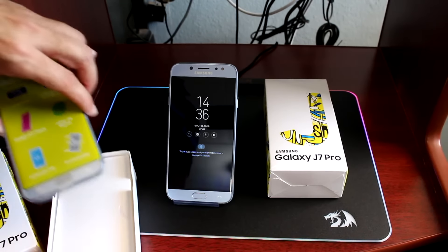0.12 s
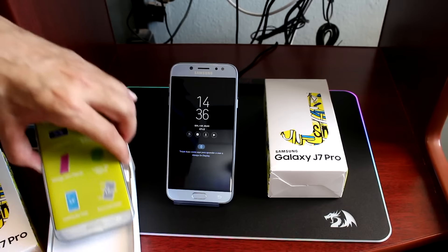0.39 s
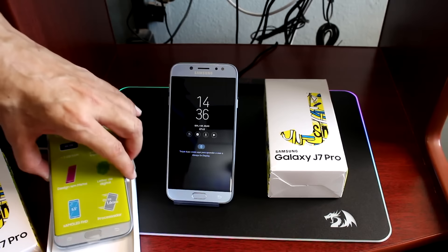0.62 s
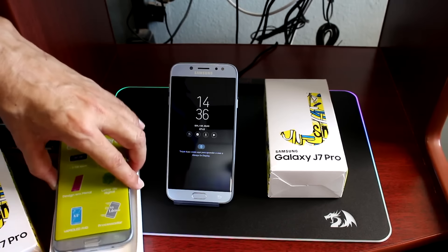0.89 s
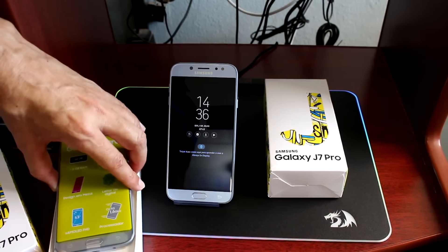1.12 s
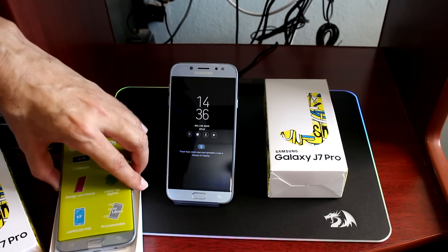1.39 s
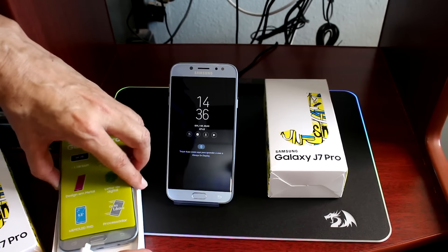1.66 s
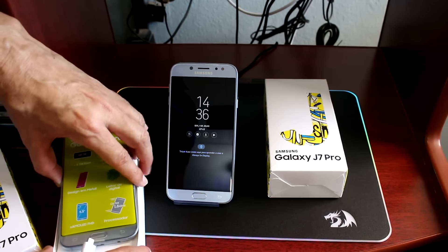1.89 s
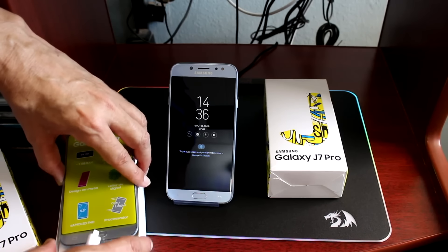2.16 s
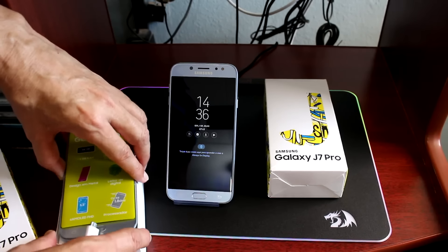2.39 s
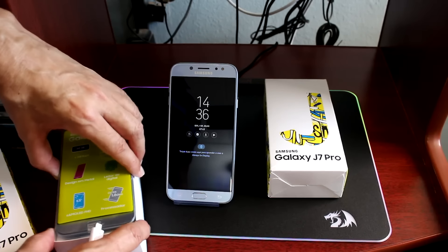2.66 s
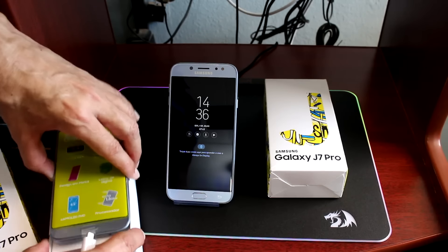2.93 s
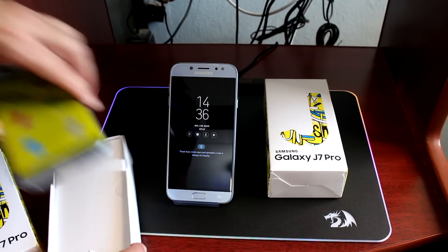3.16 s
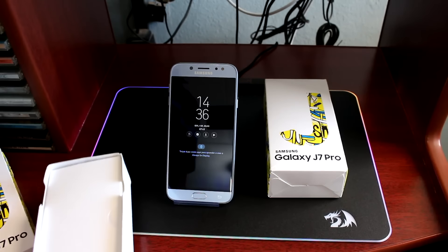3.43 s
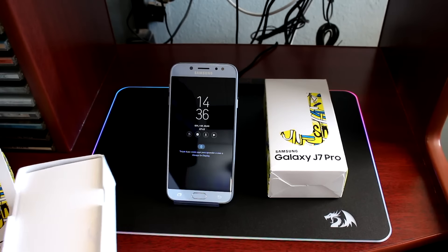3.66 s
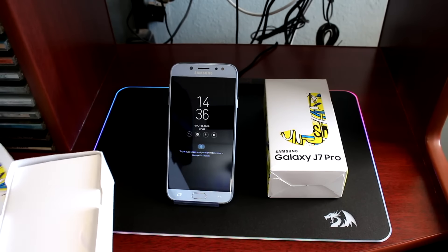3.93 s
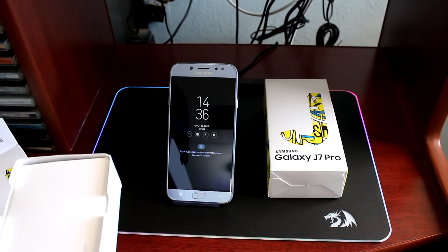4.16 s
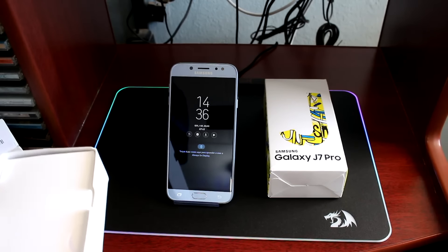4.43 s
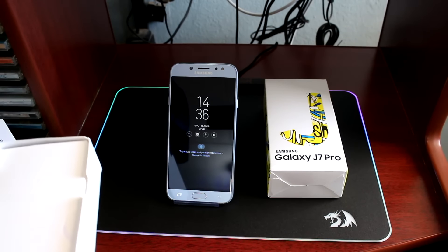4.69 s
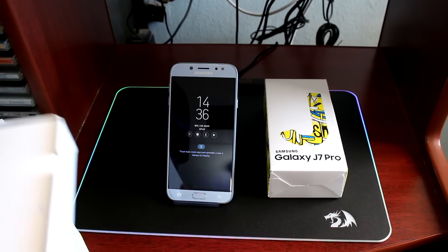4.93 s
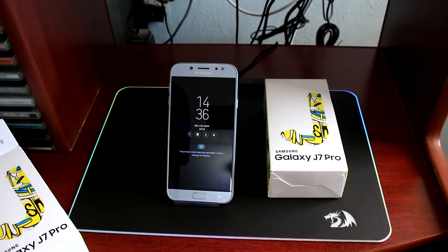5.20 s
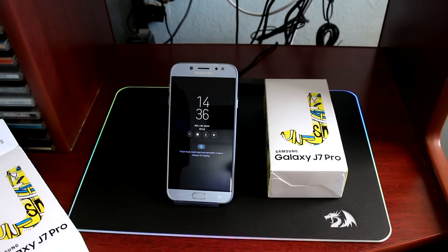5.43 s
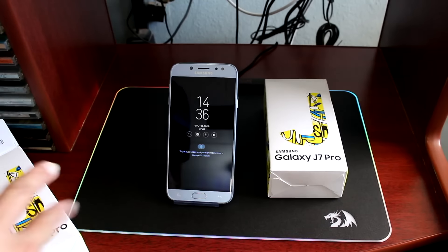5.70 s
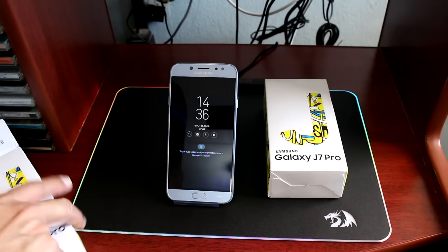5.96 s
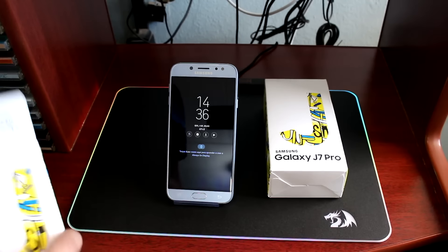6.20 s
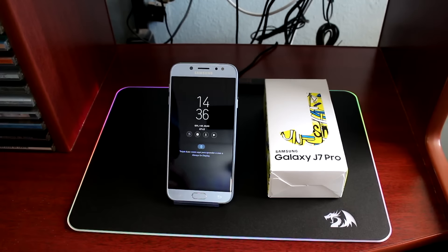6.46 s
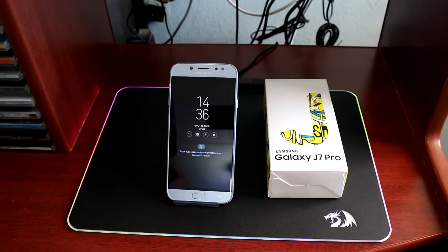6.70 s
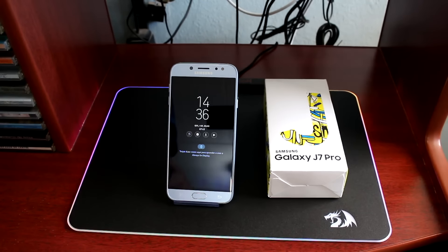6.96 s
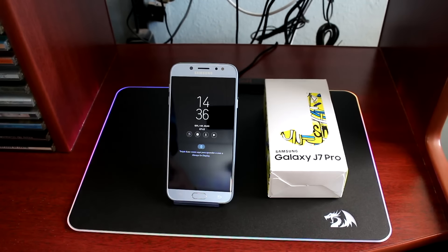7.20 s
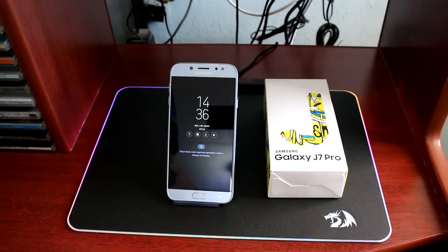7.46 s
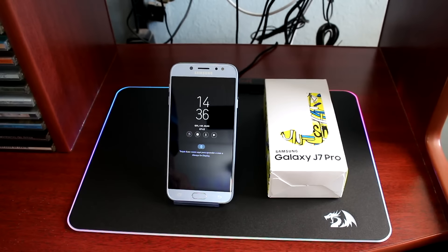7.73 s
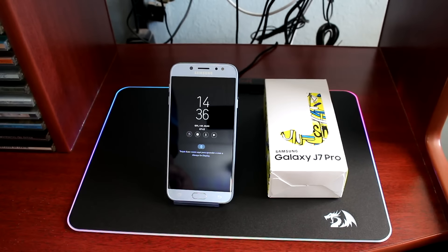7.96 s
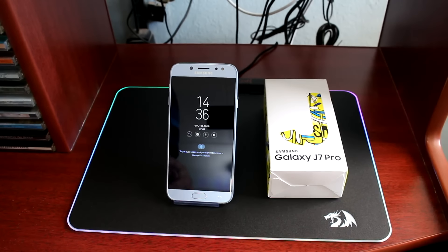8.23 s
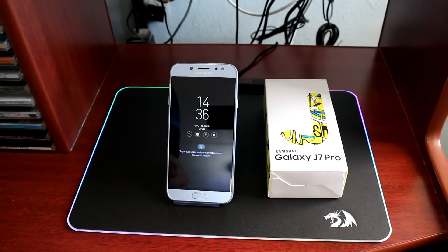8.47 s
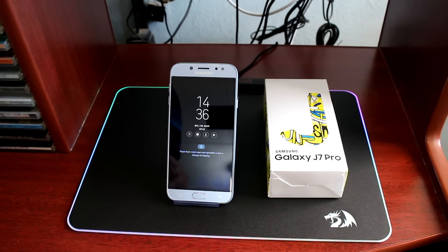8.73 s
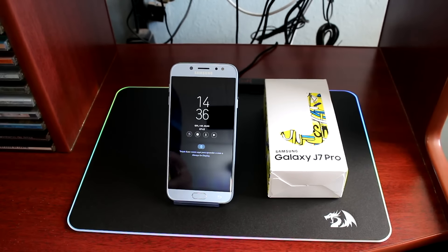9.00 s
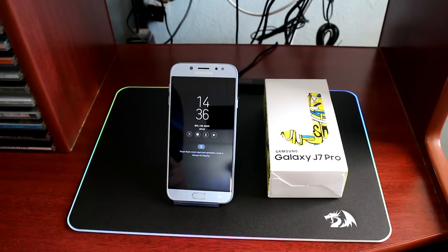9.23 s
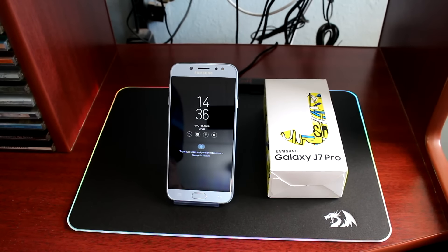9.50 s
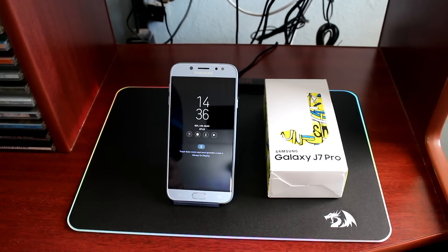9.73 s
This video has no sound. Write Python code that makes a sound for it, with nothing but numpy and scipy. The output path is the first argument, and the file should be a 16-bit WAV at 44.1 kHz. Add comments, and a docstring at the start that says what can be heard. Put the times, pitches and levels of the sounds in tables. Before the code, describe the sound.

Hollow cardboard boxes knock, scrape and tick on a wooden desk over steady hiss and low hum, busiest near the end.

```python
"""Steady hiss and hum under faint rubbing; within a quarter second, knocks of cardboard on wood.
Hands move boxes and a card tray about on a desk in a small room, close to a two-port microphone.
Each knock excites desk, box and edge resonances by one contact and a rattle; drags and slides are
random catches of fibres into resonances, ticks and scuffs are shaped noise bursts from card edges.
The room adds a brief echo; a faint thin tone wavers early on."""
import sys
import numpy as np
from scipy import signal
from scipy.fft import rfft, irfft, next_fast_len
from scipy.io import wavfile
from scipy.ndimage import uniform_filter1d, map_coordinates

SR = 44100
rng = np.random.default_rng(int(sys.argv[2]) if len(sys.argv) > 2 else 0)


def master(y):
    """Save y as 16-bit WAV."""
    cut = np.clip(np.atleast_2d(y).T, -1, 1)
    pcm = np.round(cut * 32767)  # scale
    wavfile.write(sys.argv[1], SR, pcm.astype(np.int16))


def gain_from_decibels(decibels):
    """Convert decibel values to linear amplitude factors."""
    exponent = np.asarray(decibels, float) / 20
    return 10 ** exponent


N = 435266

# hum and hiss spectrum: f/Hz, relative level/dB
HISS_SPECTRUM = [(22, -18), (38, -11), (52, -3.5), (95, -5), (140, 1.5), (227, -1.5), (278, -3.5),
                 (637, -6), (687, -8.5), (862, -7), (1230, -8), (2890, -14), (7900, -22), (13100, -27.5),
                 (15600, -31.5)]
# left-right correlation of the hiss: f/Hz, correlation/1
HISS_CORRELATION = [(60, 0.41), (240, -0.16), (950, -0.55), (3770, -0.35), (15000, -0.066)]
# decay of the room: f/Hz, t60/s
ROOM_T60 = [(100, 1), (260, 0.18), (700, 0.35), (1840, 0.27), (4850, 0.34), (12000, 0.13)]
# gain of the side echo: f/Hz, gain/dB
ROOM_SIDE_GAIN = [(100, -40), (300, -13), (700, -10), (1500, -9), (4000, -0.5), (12000, -23)]
# left minus right level at the ports: f/Hz, level/dB
PORT_LEAN = [(60, -3), (200, -1.5), (700, -5), (2400, -0.5), (4400, 1.5), (15000, 0.5)]
# left minus right phase at the ports: f/Hz, phase/rad
PORT_LEAD = [(100, -.05), (600, -.1), (1500, .55), (3500, .7), (8000, 1.2), (13000, 2.2)]
# thin tone: t/s, f/Hz, level/dB
WHINE_TRACK = [(0.68, 1450, -65), (0.75, 1390, -58), (0.85, 1396, -81), (1.3, 1392, -64.5),
               (1.56, 1390, -67)]
# desk resonances: f/Hz, width/Hz, level/dB
DESK_MODES = [(49.4, 21, -15), (140.7, 16.2, -1), (201, 56, -4.5), (259.2, 28.4, 3.5), (337, 70, -3)]
# hollow box resonances: f/Hz, width/Hz, level/dB
BOX_MODES = [(420, 17, 1), (508, 60, 0.5), (624, 41, -1), (679, 31, -2.5), (740, 29, 2.5), (830, 70, 0.5),
             (980, 53, 1), (1120, 105, 2.5), (1270, 33, 0), (1364, 32, 1)]
# stiff edge resonances: f/Hz, width/Hz, level/dB
EDGE_MODES = [(1600, 92, 4), (1964, 220, 0.5), (2306, 260, 2.5), (2650, 273, 2.5), (3000, 200, 2),
              (3450, 550, -1), (4480, 540, -6)]
# broad treble resonances of card: f/Hz, width/Hz, level/dB
SHEEN_MODES = [(4520, 5650, -6), (9200, 11000, -17)]
# flap resonances under a scuffing edge: f/Hz, width/Hz, level/dB
FLAP_MODES = [(1000, 73, 8), (2400, 350, 0.5), (3500, 350, 2), (5400, 900, -6), (8800, 2000, -18)]
# strokes of a box over desk or card:
# t at full strength/s, hold/s, desk drag level/dB, box rumble level/dB, card scrape level/dB
STROKES = [(0.15, 0.066, -67, -61.5, -69), (0.24, 0.031, -67, -53.5, -61), (0.29, 0.05, -72, -52, -57.5),
           (0.44, 0.011, -60, -54, -66), (0.6, 0.06, -65, -57.5, -64), (0.7, 0.17, -66, -62, -65),
           (0.97, 0.13, -62, -58.5, -63.5), (2.2, 0.019, -67, -53.5, -58.5), (2.41, 0.02, -58.5, -53, -66),
           (2.55, 0.027, -81, -61, -74), (3.08, 0.11, -74, -64, -64), (3.23, 0.056, -63, -56, -60),
           (3.7, 0.025, -66, -82, -61.5), (3.965, 0.072, -50, -50, -54.5), (4.13, 0.12, -47.5, -45, -55.5),
           (4.38, .015, -63, -57, -54.5), (4.405, 0.1, -37, -43, -56), (4.51, 0.18, -40, -47, -59.5),
           (4.86, 0.036, -50, -47, -58), (5.34, 0.049, -85, -57, -61), (5.58, 0.1, -67, -57, -60.5),
           (6.065, 0.016, -54, -50, -52), (6.447, 0.02, -65, -47, -48), (6.22, 0.039, -72, -70, -73),
           (6.585, .02, -57, -54, -71), (6.92, 0.016, -72, -54, -74), (7.2, 0.0096, -78, -52, -61),
           (7.39, 0.055, -67, -55.5, -58.5), (7.51, 0.028, -75, -53, -59.5), (7.577, 0.074, -59, -54, -57),
           (7.69, 0.039, -50, -47, -63), (7.78, 0.03, -38, -36.5, -51), (7.94, 0.015, -58, -47.5, -48.5),
           (8.07, 0.039, -48, -47, -50), (8.2, 0.13, -57, -49, -52.5), (8.27, 0.07, -55.5, -47, -47),
           (8.35, 0.11, -46.5, -42, -44), (8.65, 0.088, -67, -43.5, -45), (8.71, 0.041, -34, -34.5, -43),
           (9.13, 0.043, -64, -61, -73), (9.44, 0.033, -65, -69, -76), (9.69, 0.049, -65, -57, -67)]
# card sliding fast and lightly: t at full strength/s, hold/s, level/dB
SWISHES = [(0.6, .02, -72), (1.595, .02, -61), (1.81, 0.021, -56), (4.11, 0.11, -61), (4.22, 0.0088, -55),
           (4.41, 0.012, -58), (4.64, 0.013, -55.5), (6.06, 0.063, -59), (6.16, 0.016, -55),
           (7.85, 0.015, -55), (8.07, 0.012, -50.5), (8.2, 0.063, -54.5), (8.26, 0.027, -48.5),
           (8.31, 0.13, -44), (8.52, .02, -55), (8.65, 0.09, -51.5), (9.7, 0.12, -65.5)]
# median level of restless fingers: drag/dB, rumble/dB, scrape/dB, slide/dB
FUMBLE_LEVELS_DB = [-78.5, -74.5, -98, -73]
# pitches the hand leaves free to ring while card rubs: t/s, box f/Hz, edge f/Hz
GRIP_TRACK = [(0, 900, 1900), (0.3, 1100, 2200), (0.45, 800, 1900), (0.8, 1050, 1900), (1.05, 720, 2300),
              (2.2, 1150, 2100), (3.3, 1150, 2100), (3.7, 430, 2800), (4.12, 620, 2200), (4.4, 600, 2400),
              (4.53, 450, 2000), (4.62, 557, 2000), (4.9, 560, 1600), (5.35, 1100, 1700), (5.6, 800, 2200),
              (6.1, 740, 2600), (6.46, 980, 3000), (6.6, 800, 2100), (7.4, 820, 1900), (7.8, 740, 2300),
              (8.1, 780, 2400), (8.25, 1000, 2650), (8.36, 900, 2650), (8.47, 760, 2000), (8.7, 720, 1650),
              (9.87, 780, 2200)]
# scuffs of an edge along a flap: t/s, length/s, peak level/dB
SCUFFS = [(6.449, 0.038, -27), (7.91, 0.031, -36)]
# small dry ticks of card edges: t/s, peak level/dB, f/Hz, width/Hz
TICKS = [(1.04, -47, 2600, 1300), (1.585, -30.5, 3730, 1000), (1.7192, -28.5, 2830, 1800),
         (1.76, -45, 3300, 1500), (1.803, -24, 1770, 500), (1.805, -30, 5100, 2200),
         (2.2732, -46, 3180, 1500), (2.275, -38, 12000, 6000), (2.788, -45, 1800, 1500),
         (3.321, -42, 2560, 1300), (3.668, -42, 4500, 500), (3.677, -47, 4470, 900),
         (4.094, -33.5, 4500, 700), (4.225, -37, 2660, 1300), (4.378, -40, 4500, 3500),
         (4.634, -33.5, 9200, 4380), (4.635, -37, 5500, 1500), (4.638, -37.5, 3050, 1500),
         (4.9677, -38, 2940, 1500), (5.639, -41, 2070, 1000), (7.1831, -40, 4900, 2000),
         (7.576, -41, 2200, 1100), (8.5109, -18, 3060, 1500), (9.494, -46, 3280, 700),
         (9.568, -43, 1600, 600)]
# knocks: t/s, box ring peak level/dB, desk thud peak level/dB, edge click peak level/dB, ring f/Hz
KNOCKS = [(0.222, -37, -51, -41.5, 1120), (0.388, -33.5, -41, -44, 800), (0.432, -41, -64, -48, 1110),
          (0.46, -39, -48, -47, 800), (0.521, -33.5, -67, -57, 1150), (0.556, -33, -45.5, -41.5, 930),
          (0.622, -35.5, -46, -45, 886), (0.832, -41.5, -66, -55, 1120), (0.921, -34, -49, -41, 1016),
          (1.215, -45.5, -58, -60, 720), (1.257, -46, -62, -58, 1200), (1.586, -17.5, -31, -26.5, 474),
          (1.59, -23.5, -38.5, -34, 420), (1.613, -31.5, -40, -43, 420), (1.784, -56, -60, -65, 1130),
          (1.8, -17, -53, -23.5, 560), (1.805, -21, -52, -28.5, 510), (1.829, -24.5, -61, -51, 740),
          (2.785, -43.5, -49, -55, 401), (3.677, -50, -42.5, -49, 401), (3.803, -47, -45.5, -55, 401),
          (3.956, -28.5, -34, -34, 401), (4.087, -15, -29, -31.5, 604), (4.096, -26, -23.5, -46, 686),
          (4.134, -28, -30.5, -38, 420), (4.346, -36.5, -43, -41, 409), (4.402, -30, -33, -40, 765),
          (4.432, -38, -35, -50, 696), (4.481, -26, -32.5, -47, 423), (4.595, -28.5, -38, -50, 620),
          (4.68, -50, -37, -61, 420), (4.785, -13, -19, -22, 420), (4.796, -15.5, -28, -35, 524),
          (4.898, -14.5, -21.5, -30, 1290), (4.91, -15.5, -37, -28, 483), (4.939, -21.5, -32, -46, 645),
          (5.287, -46.5, -54, -45.5, 587), (5.331, -42, -63, -43, 1420), (5.35, -29, -65, -36, 1130),
          (5.373, -41, -61, -37.5, 1210), (5.419, -29.5, -46, -36.5, 840), (5.454, -36, -53, -53, 740),
          (5.523, -27, -34, -28.5, 830), (6.054, -36, -47, -46, 730), (6.105, -24, -39, -31, 514),
          (6.112, -28.5, -35, -37, 626), (6.157, -22, -30.5, -31.5, 710), (6.299, -36.5, -56, -42.5, 730),
          (6.434, -26, -48, -36, 980), (6.559, -20.5, -42, -26.5, 835), (6.847, -26, -31, -28, 580),
          (6.997, -39, -63, -63, 980), (7.056, -19, -49, -29.5, 940), (7.06, -23.5, -46, -34, 980),
          (7.137, -29.5, -52, -52, 846), (7.167, -34.5, -36.5, -40.5, 409), (7.592, -35, -53, -48, 970),
          (7.664, -22.5, -34.5, -38, 1120), (7.715, -21, -47, -26.5, 790), (7.737, -24.5, -52, -39, 1090),
          (7.756, -36, -32.5, -31, 1020), (7.765, -29, -29, -24.5, 900), (7.773, -14, -28, -25, 740),
          (7.779, -19.5, -36, -28, 740), (7.839, -26.5, -48, -31, 760), (7.937, -28, -50, -48.5, 750),
          (7.988, -33, -39.5, -35.5, 820), (8.011, -35.5, -59, -50, 807), (8.07, -35, -39, -41, 800),
          (8.203, -39, -43.5, -43, 1000), (8.237, -37, -57, -39, 1000), (8.268, -35, -48, -36, 1100),
          (8.341, -31, -32, -30, 1010), (8.4, -12.5, -32, -31, 760), (8.41, -17.5, -28.5, -19.5, 1000),
          (8.489, -30, -52, -44, 900), (8.511, -20, -44, -18, 1350), (8.596, -28, -52, -31.5, 1137),
          (8.641, -26.5, -39.5, -28, 760), (8.69, -25, -40, -22.5, 1140), (8.716, -8, -24.5, -13, 585),
          (8.725, -18, -44, -13, 760), (8.744, -30, -52, -42, 624), (9.039, -40, -62, -48, 1130),
          (9.081, -36.5, -53, -40.5, 800), (9.385, -46, -47, -47, 1100), (9.393, -41, -56, -43.5, 1380),
          (9.499, -41.5, -51, -42.5, 719), (9.621, -40, -44, -36.5, 900), (9.628, -35.5, -55, -43, 740),
          (9.676, -36.5, -58, -54, 760), (9.685, -36.5, -63, -38.5, 800), (9.742, -43, -48, -49, 573),
          (9.78, -37, -44, -40, 1180)]


def unit(x):
    """Scaled to rms 1."""
    return x / np.sqrt(np.mean(x ** 2) + 1e-20)


def along(points, hz):
    """(Hz, value) points interpolated on a log frequency axis."""
    f, v = np.transpose(points)
    return np.interp(np.log(hz + 1), np.log(f + 1), v)


def curves(rows):
    """One value per sample for each column after the time."""
    s, *cols = np.transpose(rows)
    return [np.interp(np.arange(N) / SR, s, c) for c in cols]


def wobble(knots_per_s):
    """A smooth random curve: a spline through normal draws."""
    knots = rng.standard_normal(int(N * knots_per_s / SR) + 4)
    return map_coordinates(knots, [np.arange(N) * knots_per_s / SR])


def filtered(x, response):
    """x times a complex response of frequency."""
    m = next_fast_len(x.shape[-1] + 8192)
    spectrum = rfft(x, m) * response(np.fft.rfftfreq(m, 1 / SR))
    return irfft(spectrum, m)[..., :x.shape[-1]]


def body(modes, shift_db=0, stretch=1, sign=-1):
    """Causal response of a sum of resonances, each with extra gain and detuning; sign=-1 alternates polarity."""
    hz, width, db = np.transpose(modes)[:, :, None]
    hz = hz * np.reshape(stretch, (-1, 1))
    polarity = sign ** np.arange(len(modes))[:, None]
    gain = gain_from_decibels(db + np.reshape(shift_db, (-1, 1))) * polarity
    return lambda f: np.sum(gain * 1j * f * width / (hz ** 2 - f ** 2 + 1j * f * width), axis=0)


def add(track, s, sound, peak_db):
    """Lays a sound on the track at a time and a peak level."""
    part = track[round(s * SR):][:len(sound)]
    part += gain_from_decibels(peak_db) * sound[:len(part)] / np.abs(sound).max()


def swells(rows, rise_db_per_s, fall_db_per_s):
    """Gain of each level column: every row swells, holds and dies away; powers add."""
    t = np.arange(0, N + 64, 64) / SR
    start, hold, *levels = np.transpose(rows)[:, :, None]
    rise_db = -rise_db_per_s * np.maximum(start - t, 0)
    fall_db = -fall_db_per_s * np.maximum(t - start - hold, 0)
    gains = [np.sqrt(np.sum(gain_from_decibels(db + rise_db + fall_db) ** 2, axis=0)) for db in levels]
    return [np.interp(np.arange(N) / SR, t, gain) for gain in gains]


def friction(modes, catches_per_s, spread_db, smooth, lumps_db, free_hz=None):
    """Fibres catch in clumps over a smooth rush into sharpened resonances; modes near free_hz ring most."""
    biggest = 2.2  # hardest catch, in units of spread_db
    grip_db_per_octave = 9
    hit = rng.random(N) < catches_per_s / SR * gain_from_decibels(lumps_db * wobble(14))
    strength = gain_from_decibels(spread_db * np.minimum(rng.exponential(1, N), biggest))
    grains = hit * rng.standard_normal(N) * strength
    rush = smooth * rng.standard_normal(N) * gain_from_decibels(lumps_db * wobble(25))
    force = unit(grains) + rush

    def ring(part):
        response = body(part)
        return unit(filtered(force, lambda f: response(f) * np.abs(response(f)) ** .5))

    if free_hz is None:
        return ring(modes)
    share = gain_from_decibels([db - grip_db_per_octave * np.abs(np.log2(hz / free_hz)) for hz, width, db in modes])
    rings = [(-1) ** k * ring([mode]) for k, mode in enumerate(modes)]
    return np.sum(share * rings, axis=0) / np.linalg.norm(share, axis=0)


def hiss():
    """Steady room hum and microphone hiss: shaped noise, slightly patchy in time and frequency."""
    rms_db = -53.5
    port_offset_db = np.array([[-.7], [.7]])
    z = signal.stft(rng.standard_normal((2, N)), nperseg=512)[2]
    field = uniform_filter1d(rng.standard_normal(z.shape[1:]), 6, 0)
    patches_db = 2.05 * unit(uniform_filter1d(field, 14, 1))
    pair = signal.istft(z * gain_from_decibels(patches_db), nperseg=512)[1][:, :N]

    def spectrum(hz):
        # mid and side shares that give the wanted correlation
        angle = np.arccos(np.clip(along(HISS_CORRELATION, hz), -1, 1)) / 2
        return gain_from_decibels(along(HISS_SPECTRUM, hz)) * [np.cos(angle), np.sin(angle)]

    mid, side = filtered(pair, spectrum)
    return gain_from_decibels(rms_db + port_offset_db) * unit(np.array([mid + side, mid - side]))


def room(x):
    """Mid and side echo by decaying noise, each frequency at its own speed; redrawn per hop as boxes move."""
    hop, delay = 12000, 260  # samples
    echo_db = -7.5
    out = np.zeros((2, N + SR))
    for start in range(0, N, hop):
        hz, t, z = signal.stft(rng.standard_normal((2, SR // 2)), SR, nperseg=256)
        decay = gain_from_decibels(-60 * t / along(ROOM_T60, hz)[:, None])
        tail = signal.istft(z * decay, SR, nperseg=256)[1]
        tail = tail / np.linalg.norm(tail[0])
        echo = signal.fftconvolve(x[None, start:start + hop], tail, axes=1)
        out[:, start + delay:][:, :echo.shape[1]] += echo
    mid, side = gain_from_decibels(echo_db) * out[:, :N]
    return mid, filtered(side, lambda hz: gain_from_decibels(along(ROOM_SIDE_GAIN, hz)))


def whine():
    """A faint thin sine wavers in pitch and level and fades early on."""
    hz, db = curves(WHINE_TRACK)
    t = np.arange(N) / SR
    heard = (t > WHINE_TRACK[0][0]) & (t < WHINE_TRACK[-1][0])
    level = gain_from_decibels(db + 2.2 * wobble(25.0))
    phase = 2 * np.pi * np.cumsum(hz * (1 + 0.013 * wobble(29.3))) / SR
    return heard * level * np.sin(phase)


def rubbing():
    """Boxes drag on the desk and card slides on card; returns the common part and the left-right difference."""
    slide_over_scrape_db = -7
    wide_slide_db, wide_scrape_db = -2.5, -7  # a sliding sheet is broad: its hiss differs between ports
    drag, rumble, scrape = swells(STROKES, rise_db_per_s=1098, fall_db_per_s=286)
    swish = swells(SWISHES, rise_db_per_s=800, fall_db_per_s=332)[0]
    slide = np.hypot(gain_from_decibels(slide_over_scrape_db) * scrape, swish)
    # fingers never rest
    restless_db = 3.7 * np.array([wobble(12) for layer in FUMBLE_LEVELS_DB])
    fumble = gain_from_decibels(np.array(FUMBLE_LEVELS_DB)[:, None] + restless_db)
    drag, rumble, scrape, slide = np.hypot([drag, rumble, scrape, slide], fumble)
    box_hz, edge_hz = curves(GRIP_TRACK)
    common = drag * friction(DESK_MODES[2:], 200, spread_db=2, smooth=0.75, lumps_db=2.0)
    common += rumble * friction(BOX_MODES, 300, spread_db=2.5, smooth=0.64, lumps_db=3.0, free_hz=box_hz)
    common += scrape * friction(EDGE_MODES, 810, spread_db=-0.5, smooth=0.62, lumps_db=5, free_hz=edge_hz)
    common += slide * friction(SHEEN_MODES, 2500, spread_db=5.0, smooth=2.0, lumps_db=2.5)
    wide_slide = slide * friction(SHEEN_MODES, 2800, spread_db=9, smooth=1.2, lumps_db=2)
    wide_scrape = scrape * friction(EDGE_MODES, 1300, spread_db=4, smooth=.8, lumps_db=0.5)
    return common, gain_from_decibels(wide_slide_db) * wide_slide + gain_from_decibels(wide_scrape_db) * wide_scrape


def scuffs():
    """A card edge scuffs along a flap: a half-sine stroke of spiky noise sings on a few bands."""
    out = np.zeros(N)
    for s, length_s, db in SCUFFS:
        stroke = np.sin(np.pi * np.clip(np.arange(SR // 10) / SR / length_s, 0, 1))
        force = stroke * rng.standard_normal(len(stroke)) ** 3
        add(out, s, filtered(force, body(FLAP_MODES)), db)
    return out


def ticks():
    """A card edge flicks free: an impulse and dying noise through one resonance twice."""
    t60_s = .011
    out, t = np.zeros(N), np.arange(SR // 40) / SR
    for s, db, hz, width_hz in TICKS:
        flick = (4 * (t == 0) + rng.standard_normal(len(t))) * gain_from_decibels(-60 * t / t60_s)
        edge = body([(hz, width_hz, 0)])
        add(out, s, filtered(flick, lambda f: edge(f) ** 2), db)
    return out


def knocks():
    """A face lands with one hard contact and a quick rattle that drive desk, box and edge together."""
    soft_t60_s, hard_t60_s = 0.083, 0.034  # rattle at box ring levels of -40 dB and -10 dB
    push_s, snap_s = 0.00013, 0.00004  # first contact as the faces feel it and as the edge does
    soft_hz = 1800  # the faces yield and pass little of a blow above this
    favour_db_per_octave = 18.5  # loss of a box mode away from the struck spot
    desk_scatter_db, box_scatter_db, edge_scatter_db, detune = 0.97, 2, 2, .012
    sheen_over_edge_db = -10.5
    out, t = np.zeros(N), np.arange(SR // 6) / SR
    ring_hz, click_hz = np.transpose(BOX_MODES)[0], np.transpose(EDGE_MODES)[0]
    for s, box_db, desk_db, edge_db, hz in KNOCKS:
        t60_s = np.interp(box_db, [-40, -10], [soft_t60_s, hard_t60_s])
        noise = rng.standard_normal(len(t))
        rattle = noise * np.abs(noise) ** 1.75 * gain_from_decibels(-60 * t / t60_s)
        push = rattle + 6 * t / push_s * np.exp(1 - t / push_s)
        push = filtered(push, lambda f: 1 / (1 + 1j * f / soft_hz))
        snap = rattle + 18 * np.exp(-t / snap_s)

        box_shift_db = -favour_db_per_octave * np.abs(np.log2(ring_hz / hz))
        box_shift_db += rng.normal(0, box_scatter_db, len(BOX_MODES))
        box = body(BOX_MODES, box_shift_db, rng.normal(1, detune, len(BOX_MODES)), sign=1)
        add(out, s, filtered(push, box), box_db)

        desk = body(DESK_MODES, rng.normal(0, desk_scatter_db, len(DESK_MODES)))
        add(out, s, filtered(push, desk), desk_db)

        # a broad blow wakes the low edge modes most
        edge_shift_db = -.35 * (box_db - edge_db + 19.0) * np.log2(click_hz / click_hz[0])
        edge_shift_db += rng.normal(0, edge_scatter_db, len(EDGE_MODES))
        edge = body(EDGE_MODES, edge_shift_db, rng.normal(1, detune, len(EDGE_MODES)))
        add(out, s, filtered(snap, edge), edge_db)

        sheen = body(SHEEN_MODES)
        add(out, s, filtered(filtered(snap, sheen), sheen), edge_db + sheen_over_edge_db)
    return out


def scene():
    """Direct sound and echo reach the two ports at unequal level and phase, over the hiss."""
    tick_echo_db = -9  # ticks and scuffs into the room
    rub, broad = rubbing()
    boxes = knocks() + rub + whine()
    close = ticks() + scuffs()
    near = boxes + close
    mid, side = room(boxes + gain_from_decibels(tick_echo_db) * close)

    def ports(hz):
        half = gain_from_decibels(along(PORT_LEAN, hz) / 2) * np.exp(.5j * along(PORT_LEAD, hz))
        return half ** np.array([[1], [-1]])

    pair = np.array([near + mid + side + broad, near + mid - side - broad])
    return filtered(pair, ports) + hiss()


def band_limit(x):
    """A steep low-pass at the top of the band."""
    return signal.sosfilt(signal.butter(12, 16470, fs=SR, output="sos"), x)


def record(dry):
    """The recorder keeps nothing above its band limit."""
    top_hz = 15730
    mix = filtered(dry, lambda hz: hz < top_hz)
    return band_limit(mix)


dry = scene()
out = record(dry)
master(out)
```